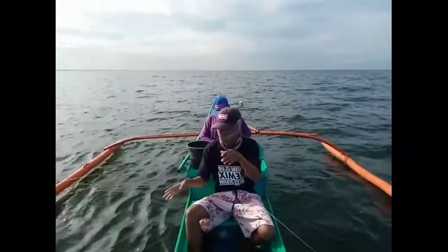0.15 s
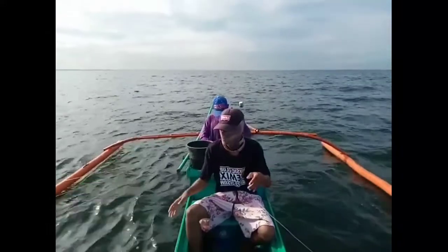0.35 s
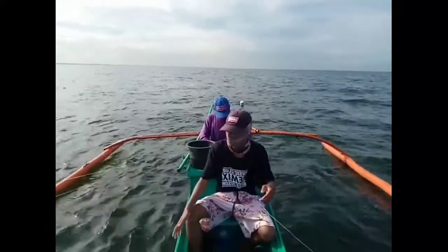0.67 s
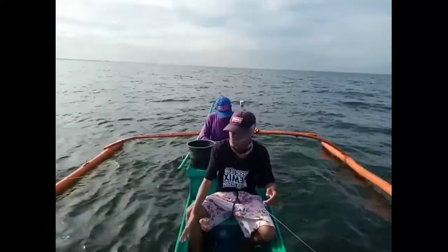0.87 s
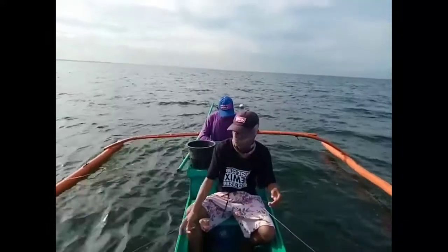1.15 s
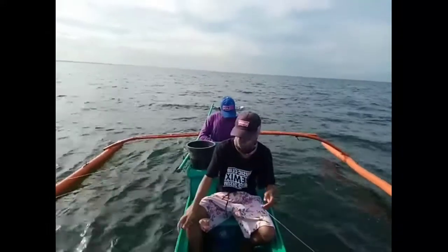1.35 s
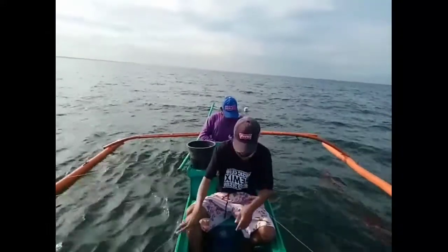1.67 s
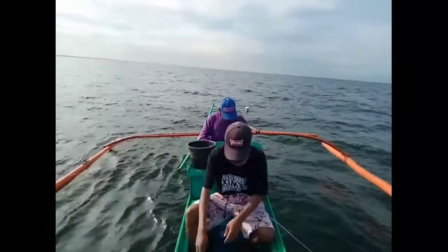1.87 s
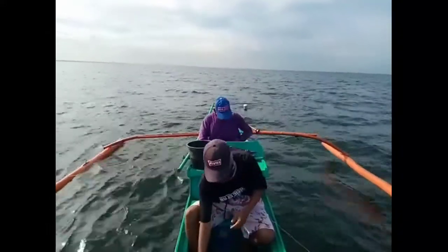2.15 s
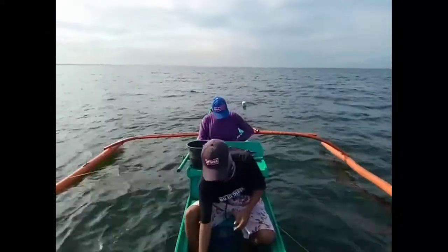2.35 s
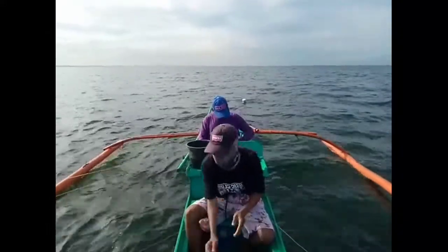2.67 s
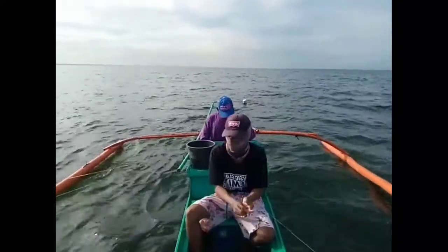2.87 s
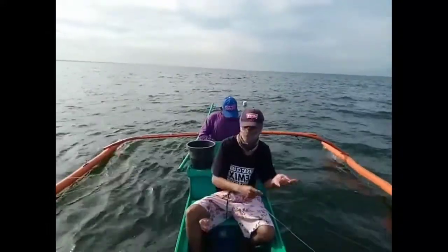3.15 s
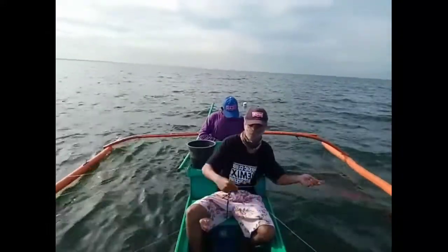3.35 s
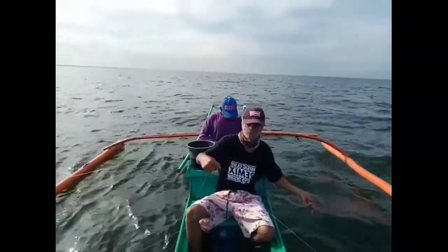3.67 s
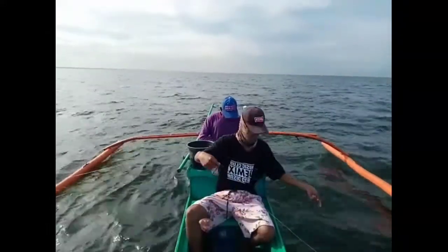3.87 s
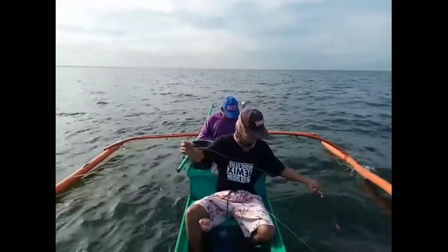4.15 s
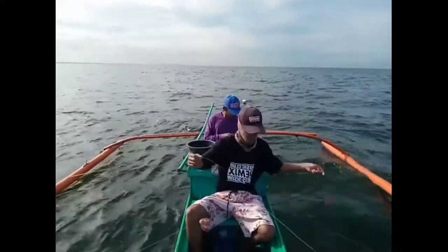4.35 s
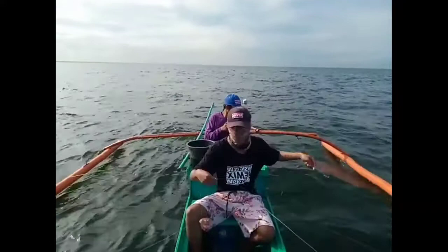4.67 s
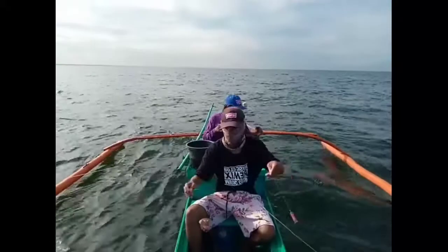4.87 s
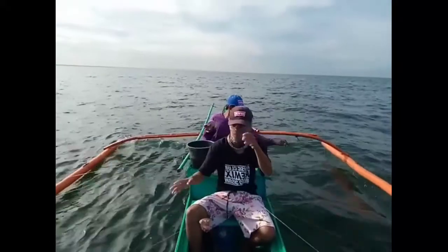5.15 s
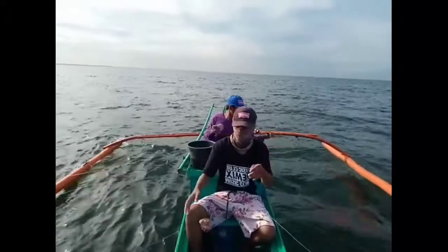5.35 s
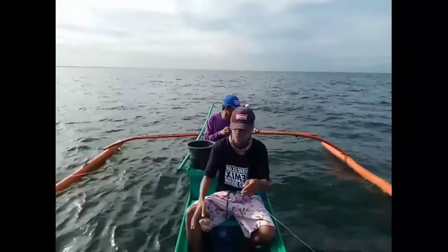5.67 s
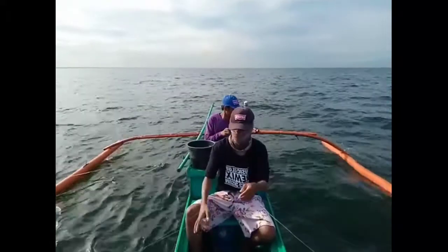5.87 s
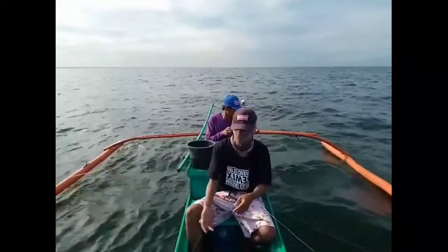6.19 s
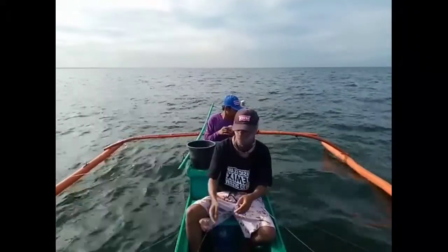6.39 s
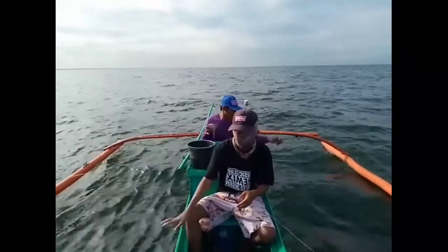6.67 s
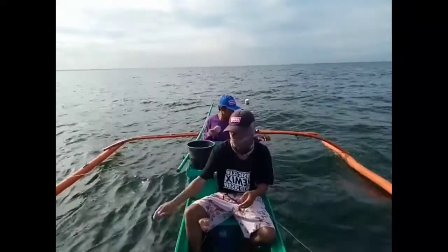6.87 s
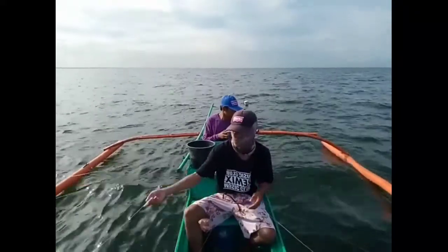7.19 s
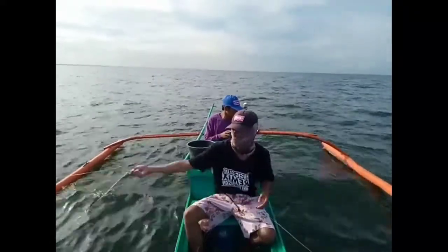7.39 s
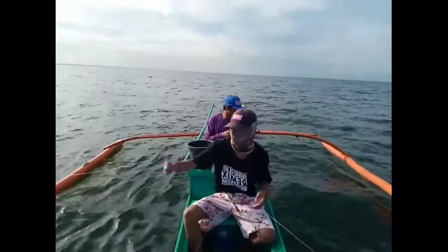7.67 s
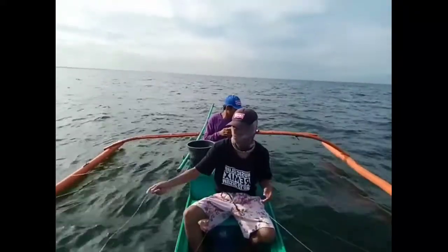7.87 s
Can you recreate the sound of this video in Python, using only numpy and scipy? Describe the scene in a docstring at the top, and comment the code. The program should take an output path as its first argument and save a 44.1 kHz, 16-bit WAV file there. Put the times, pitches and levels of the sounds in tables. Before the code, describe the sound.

Small waves lap and gurgle against a small wooden boat on open sea, with sharp drips, hollow plops, crackling spray and low wind rumble on the microphone.

```python
"""Waves lapping an outrigger boat

Small waves lap at the hull of a boat drifting on open sea, gurgling as swarms of ringing bubbles.
Trapped air pockets plop, hollows glug, and spray crackles and ticks as bursts of tiny rings and noise.
Gusts of wind rumble as shaped noise and bump as brief pitch sweeps on the nearly mono microphone."""
import sys
import numpy as np
from scipy import signal
from scipy.fft import rfft, irfft, next_fast_len
from scipy.io import wavfile
from scipy.ndimage import uniform_filter1d, map_coordinates

SR = 44100
rng = np.random.default_rng(int(sys.argv[2]) if len(sys.argv) > 2 else 0)


def generate_wav(signal):
    """Clip the signal to [-1, 1] and save it as 16-bit WAV at the path in sys.argv[1]."""
    frames = np.transpose(np.atleast_2d(signal))
    scaled = np.clip(frames, -1, 1) * 32767
    pcm = np.round(scaled).astype(np.int16)
    wavfile.write(sys.argv[1], SR, pcm)


N = 354123
TOP_HZ = 15700  # band limit, also the cap on bubble pitch
STEP = 32  # samples between points of an envelope


def amp(db):
    """Decibels to gain."""
    return 10 ** (np.asarray(db) / 20)


def unit(x):
    """Scale to rms 1."""
    return x / np.sqrt(np.mean(x ** 2) + 1e-20)


def along(points, hz):
    """(Hz, value) points read on a log frequency axis."""
    f, v = np.transpose(points)
    return np.interp(np.log(hz + 1), np.log(f + 1), v)


def filtered(x, response):
    """x times a response of frequency."""
    size = next_fast_len(N + SR // 2)
    gain = response(np.fft.rfftfreq(size, 1 / SR))
    return irfft(rfft(x, size) * gain, size)[..., :N]


def coloured(x, spectrum):
    """x filtered by (Hz, dB) points, at rms 1."""
    return unit(filtered(x, lambda hz: amp(along(spectrum, hz))))


def noise(spectrum):
    """Fresh noise of rms 1 with this spectrum."""
    return coloured(rng.standard_normal(N), spectrum)


def band_noise(centres_hz, size, low, high):
    """One row of noise of rms 1 per centre, between low and high times its pitch."""
    rows = []
    for band in np.minimum(centres_hz * [low, high], TOP_HZ):
        b, a = signal.butter(2, band, "band", fs=SR)
        rows.append(unit(signal.lfilter(b, a, rng.standard_normal(size))))
    return np.array(rows)


def even(x, seconds):
    """x with its slow swells levelled out."""
    width = int(seconds * SR)
    power = uniform_filter1d(uniform_filter1d(x ** 2, width), width)
    return x / np.sqrt(np.abs(power) + 1e-9)


def flutter(rate):
    """A smooth random curve, rate knots a second."""
    knots = rng.standard_normal(int(N * rate / SR) + 4)
    return map_coordinates(knots, [np.arange(N) * rate / SR])


def patchy(x, depth_db, size):
    """Random gain in patches of frequency and time, size frames long."""
    z = signal.stft(x, nperseg=512)[2]
    field = rng.standard_normal(z.shape)
    for _ in range(2):
        field = uniform_filter1d(field, size=4, axis=0)
        field = uniform_filter1d(field, size=size, axis=1)
    return unit(signal.istft(z * amp(depth_db * unit(field)), nperseg=512)[1][:N])


def swell(start, hold, rise, fall):
    """Envelope in dB: attack, hold and release, the slopes given as seconds per 20 dB."""
    t = np.arange(0, N, STEP) / SR - start
    attack = np.minimum(t / rise, 0)
    release = np.maximum(t - hold, 0) / fall
    return 20 * np.maximum(attack - release, -10)


def per_sample(envelope):
    """An envelope with one value for every sample."""
    return np.interp(np.arange(N), np.arange(0, N, STEP), envelope)


def together(levels_db):
    """The level of several envelopes at once: their powers add."""
    power = sum(amp(db) ** 2 for db in levels_db)
    return per_sample(10 * np.log10(power))


def placed(starts, sounds):
    """Sum rows of sound at their start times in seconds."""
    first = np.round(np.abs(np.reshape(starts, (-1, 1))) * SR).astype(int)
    index = first + np.arange(sounds.shape[1])
    return np.bincount(index.ravel(), sounds.ravel(), N)[:N]


def bubble(t, hz, t60, rise, onset_cycles):
    """A damped ring whose pitch moves by rise octaves over t60, up as a bubble nears the surface."""
    pitch_hz = hz * 2 ** (rise * np.minimum(t / t60, 1))
    phase = 2 * np.pi * np.cumsum(pitch_hz, axis=-1) / SR
    return np.sin(phase) * amp(-60 * t / t60) * (1 - np.exp(-t * hz / onset_cycles))


def swarm(count, size, centre_hz, octaves, cycles, rise, onset_cycles=0.34):
    """Bubbles at random times, of random pitch, life and strength; centre_hz may be a curve."""
    when, pitch, life, strength, sign = rng.random((count, 5)).T[..., None]
    centre = np.broadcast_to(centre_hz, N)[(when * N).astype(int)]
    hz = np.minimum(centre * 2 ** (octaves * (2 * pitch - 1)), TOP_HZ)
    t60 = cycles * 2 ** (2 * life - 1) / hz
    rings = bubble(np.arange(size) / SR, hz, t60, rise, onset_cycles)
    # most are faint, a few strong
    gain = amp(7 * np.minimum(-np.log(1 - strength), 2.8)) * np.sign(sign - .5)
    fade = np.sqrt(np.linspace(1, 0, size))
    return unit(placed(when * N / SR, gain * rings * fade))


def wind():
    """Eddies rumble on the microphone in uneven lumps, deeper as the wind grows."""
    # Each row: start in seconds, time at full level in seconds, relative level in dB.
    gusts = [(0.0, 0.33, -37.5), (0.6, 0.19, -36.5), (0.86, 0.37, -41.0), (1.32, 0.15, -37.0),
             (1.6, 0.61, -44.0), (2.36, 0.12, -42.0), (2.56, 0.25, -47.5), (2.91, 0.33, -42.5),
             (3.35, 0.07, -34.0), (3.46, 0.46, -45.0), (3.98, 0.26, -40.0), (4.35, 0.09, -33.5),
             (4.85, 0.1, -45.0), (5.09, 0.23, -45.5), (5.47, 0.26, -43.5), (5.92, 0.5, -49.0),
             (6.51, 0.32, -35.0), (6.92, 0.25, -38.0), (7.21, 0.27, -43.0), (7.55, 0.36, -47.0)]
    # Spectra of weak and strong wind. Each row: frequency in Hz, relative level in dB.
    breeze_spectrum = [(25, -55), (48, -36), (90, -7), (130, 0), (170, -7), (260, -23.5), (380, -33),
                       (1300, -64)]
    gust_spectrum = [(25, -38.5), (60, -1.5), (96, 0), (141, -2.5), (270, -34), (490, -44.5), (1300, -70.5)]
    calm_db = -57  # relative, between gusts
    rise_s, fall_s = .033, .074  # per 20 dB
    levels_db = [calm_db] + [db + swell(s, hold, rise_s, fall_s) for s, hold, db in gusts]
    level_db = together(levels_db)
    strong = np.clip((level_db + 49) / 10, 0, 1)
    rumble = np.sqrt(1 - strong) * noise(breeze_spectrum) + np.sqrt(strong) * noise(gust_spectrum)
    lumps_db = 3 * flutter(24)
    return amp(level_db + .3) * even(amp(lumps_db) * rumble, seconds=0.24)


def lapping():
    """Each wave swells and drains, driving gurgle and spray; stronger waves weigh more in bubble pitch."""
    # Waves folding over along the hull. Each row: crest in seconds, relative gurgle level in dB,
    # relative spray level in dB, swell in seconds per 20 dB, drain in seconds per 20 dB,
    # bubble pitch in Hz.
    waves = [(0.143, -53.5, -57.5, 0.17, 0.76, 1570.0), (0.52, -46.0, -46.0, 0.025, 0.16, 2200.0),
             (1.017, -48.5, -61.5, 0.17, 0.16, 1780.0), (1.356, -51.0, -60.5, 0.05, 0.23, 1150.0),
             (1.576, -56.5, -55.5, 0.39, 0.46, 1780.0), (1.905, -52.0, -69.5, 0.06, 0.12, 1700.0),
             (2.355, -41.5, -66, .035, .08, 2000), (2.428, -37, -44.0, 0.09, 0.06, 1800.0),
             (2.605, -56.5, -57.5, 0.1, 0.9, 1400.0), (2.927, -53.5, -55.0, 0.1, 0.24, 1710.0),
             (3.26, -54.0, -67.5, 0.03, 0.12, 1130.0), (3.805, -53, -63.0, 0.1, 0.04, 1980.0),
             (4.056, -47, -44.5, 0.14, 0.4, 1900.0), (4.166, -43.0, -42.5, 0.04, 0.11, 1650.0),
             (4.555, -54.5, -58, 0.19, 0.29, 1650.0), (4.843, -64.0, -57.5, 0.05, 0.56, 1630.0),
             (5.185, -47.0, -53.0, 0.02, 0.41, 1110.0), (5.599, -44.5, -42.0, 0.19, 0.26, 1220.0),
             (5.721, -38.5, -39.0, 0.06, 0.18, 1960.0), (5.894, -41.0, -50.0, 0.07, 0.39, 1270.0),
             (6.26, -52, -64, .3, .18, 1900), (6.739, -57.5, -37.5, 0.07, 0.05, 2350.0),
             (6.884, -52.0, -62.0, 0.03, 0.15, 1560.0), (7.11, -43.5, -44.0, 0.02, 0.16, 2890.0),
             (7.183, -44.5, -48.5, 0.07, 0.06, 2310.0), (7.365, -56.0, -39.0, 0.02, 0.07, 2740.0),
             (7.563, -65.5, -48.0, 0.07, 0.15, 2740.0)]
    # Spatters thrown clear of the waves. Each row: time in seconds, relative level in dB.
    spatters = [(0.726, -42.0), (0.803, -44.0), (0.938, -48.0), (1.113, -55.0), (2.511, -41.0),
                (2.78, -48.0), (3.039, -46.0), (3.075, -48.0), (3.409, -48.0), (3.961, -44.0),
                (4.022, -42.0), (4.339, -47.0), (4.982, -53.0), (6.311, -49.0), (6.678, -43.0),
                (6.785, -43.0), (6.938, -50.0), (7.27, -44.0), (7.311, -42.0), (7.418, -40.0),
                (7.814, -54.0)]
    ripple_gurgle_db, ripple_spray_db = -80, -73.5  # relative, between the waves
    crest_hold_s = .01
    spatter_rise_s, spatter_fall_s = .014, .049  # per 20 dB
    spatter_gurgle_db = -12  # against the spatter's spray
    gurgles, sprays, weight, pitch = [ripple_gurgle_db], [ripple_spray_db], 0, 0
    for s, gurgle_db, spray_db, rise, fall, hz in waves:
        shape_db = swell(s, crest_hold_s, rise, fall)
        gurgles.append(gurgle_db + shape_db)
        sprays.append(spray_db + shape_db)
        share = amp(gurgle_db + shape_db)
        weight, pitch = weight + share, pitch + share * hz
    for s, db in spatters:
        spatter_db = db + swell(s, 0, spatter_rise_s, spatter_fall_s)
        gurgles.append(spatter_db + spatter_gurgle_db)
        sprays.append(spatter_db)
    return together(gurgles), together(sprays), per_sample(pitch / weight)


def spray(level_db, churn_db):
    """Thrown water crackles with dense, overlapping droplets; the quiet wash is trickling foam."""
    # Spectra of splash and wash. Each row: frequency in Hz, relative level in dB.
    splash_spectrum = [(1000, -20.5), (2200, -4.5), (3800, -9.5), (5200, 0.5), (7000, 3), (8300, -4.5),
                       (11000, -2), (13000, -10.5), (16000, -2)]
    wash_spectrum = [(1200, -7), (2600, -3), (4400, -7), (5300, 1), (7200, 5.5), (9000, -2), (11000, -5),
                     (13000, -16.5)]
    breaking = np.clip((level_db + 0.13 * (level_db - churn_db) + 56) / 12, 0, 1)
    drops = swarm(count=4500, size=240, centre_hz=6700, octaves=1.55, cycles=21, rise=0, onset_cycles=.6)
    cracks = swarm(count=2200, size=80, centre_hz=7200, octaves=1, cycles=2.8, rise=0)
    foam = swarm(count=2400, size=600, centre_hz=5600, octaves=1.2, cycles=60, rise=0, onset_cycles=3)
    splash = coloured(drops + cracks, splash_spectrum) + .3 * noise(splash_spectrum)
    splash = patchy(splash, depth_db=3, size=2)  # short patches: bursts of drops
    trickle = patchy(noise(wash_spectrum), depth_db=5, size=7)  # long patches: drifting colour
    wash = coloured(foam + .7 * cracks, wash_spectrum) + .85 * trickle
    mix = np.sqrt(breaking) * splash + np.sqrt(1 - breaking) * unit(wash)
    clumps_db = (2.6 + breaking) * flutter(55)
    return amp(level_db + clumps_db + 1) * even(mix, seconds=0.1)


def gurgle(level_db, pitch_hz):
    """A hollow rush along the hull: ripples shed ringing bubbles, strong waves masses of short ones."""
    # Spectrum of the rush. Each row: octaves above the bubble pitch, relative level in dB.
    rush_spectrum = [(-2.2, -30), (-.8, 1), (.1, -1.5), (1.2, -5), (2.4, -28)]
    hz, s, z = signal.stft(rng.standard_normal(N), SR, nperseg=512)
    frame_pitch_hz = np.interp(s * SR, np.arange(N), pitch_hz)
    octaves = np.log2((hz[:, None] + 1) / frame_pitch_hz)
    rush_db = np.interp(octaves, *np.transpose(rush_spectrum))
    rush = signal.istft(z * amp(rush_db), nperseg=512)[1]
    thick = np.clip((level_db + 57) / 16, 0, .85)
    mass = swarm(count=3200, size=900, centre_hz=pitch_hz, octaves=1.2, cycles=22, rise=.2, onset_cycles=2)
    rings = swarm(count=1500, size=1800, centre_hz=pitch_hz, octaves=1.1, cycles=60, rise=.3,
                  onset_cycles=3.5)
    bubbles = np.sqrt(thick) * mass + np.sqrt(1 - thick) * rings
    churn = bubbles + .65 * patchy(rush, depth_db=6, size=6)
    return amp(level_db - 6.3) * even(churn, seconds=0.09)


def boat(x):
    """Short diffuse reflections from inside the boat: convolution with decaying noise."""
    # Each row: frequency in Hz, t60 in seconds.
    decay = [(300, 0.071), (2000, 0.054), (7000, 0.083), (15000, 0.017)]
    hz, t, z = signal.stft(rng.standard_normal(SR // 4), SR, nperseg=256)
    fade_db = -60 * t / along(decay, hz)[:, None]
    tail = signal.istft(z * amp(fade_db), SR, nperseg=256)[1]
    return signal.fftconvolve(x, tail / np.linalg.norm(tail))[:N]


def sea():
    """The faint wash of open water all around: steady shaped noise."""
    return amp(-71) * noise([(300, 12), (1500, -7), (7000, -29)])


def bumps():
    """Big eddies shake the diaphragm, each fastest at its core, with finer turbulence inside."""
    # Each row: centre in seconds, level in dB, top pitch in Hz, half length to 1/e in seconds.
    eddies = [(0.2047, -11, 345, 0.013), (.2087, -13, 99, 0.019), (0.232, -14, 159, 0.0049),
              (0.616, -21, 124, 0.004), (0.779, -24, 109, 0.0074), (4.0, -20, 102, 0.0056),
              (6.514, -26, 150, .008), (7.045, -16, 120, 0.0048), (7.058, -37, 270, .025)]
    t = np.arange(N) / SR
    rim_hz, core_s = 90, .005
    turbulence_spectrum = [(150, -20), (350, 0), (550, -3), (900, -18), (1500, -45), (3000, -90)]
    turbulence = amp(-20.5) * noise(turbulence_spectrum)
    out = np.zeros(N)
    for s, db, hz, half in eddies:
        turns = rim_hz * (t - s) + (hz - rim_hz) * core_s * np.arctan((t - s) / core_s)
        shake = np.cos(2 * np.pi * turns) + turbulence * (hz / 300) ** 2
        out += amp(db) * shake * np.exp(-((t - s) / half) ** 2)
    return out


def drips():
    """Each drop sizzles as it touches, cracks in a few cycles and leaves a short fizz."""
    # Each row: time in seconds, relative level in dB, ring pitch in Hz.
    drops = [(0.5118, -34.5, 7250), (0.5484, -31, 6890), (0.6013, -35, 4620), (0.7605, -33, 7500),
             (0.8011, -29, 4640), (1.0165, -32, 5200), (1.484, -35.5, 5345), (2.389, -37, 3800),
             (2.4316, -32, 6230), (2.5562, -24.5, 4750), (2.779, -40, 6590), (2.9347, -39, 3300),
             (3.261, -43, 4200), (3.403, -36.5, 3180), (3.4126, -38.5, 2940), (3.9235, -32, 2660),
             (3.9596, -32, 7180), (4.0178, -33, 7200), (4.0443, -34, 5440), (4.196, -35, 3800),
             (4.3381, -37.5, 5340), (4.593, -32.5, 2372), (4.952, -35, 5070), (5.2255, -39, 5180),
             (5.6358, -35.5, 6730), (5.7395, -19.5, 5740), (5.7564, -31, 2780), (5.7818, -34, 6770),
             (6.03, -33, 6600), (7.2129, -29, 4105), (7.3104, -34, 6400), (7.3625, -28.5, 6770),
             (7.5983, -35.5, 7710)]
    s, db, hz = np.transpose(drops)[..., None]
    lead_s, contact_s = .003, .001  # sizzle before the tick; tick after the listed time
    t = np.arange(SR // 25) / SR - lead_s
    after = np.maximum(t, 0)
    grit = band_noise(hz, len(t), low=.6, high=1.8)
    crack = grit * amp(-60 * np.abs(t) / .0035)
    tick = bubble(after, hz, t60=.004, rise=-.2, onset_cycles=.4) + .32 * crack
    tick = tick / np.abs(tick).max(axis=1, keepdims=True)
    fizz = grit * amp(-60 * after / .03) * np.minimum(1 + t / lead_s, 1) ** 3
    return placed(s + contact_s - lead_s, amp(db + 8.5) * (tick + amp(-23) * fizz))


def slaps():
    """A flat face of water hits a plank: a sudden, quickly dying burst of noise."""
    # Each row: time in seconds, level in dB, t60 in seconds.
    hits = [(0.6, -38.5, 0.04), (1.0185, -32, 0.037), (5.739, -36, 0.061), (5.893, -41, 0.07)]
    # Each row: frequency in Hz, relative level in dB.
    slap_spectrum = [(700, -40), (2000, 15), (3500, 15.5), (6000, 1), (11000, -5), (16000, -60)]
    s, db, t60 = np.transpose(hits)[..., None]
    t = np.arange(SR // 6) / SR
    bursts = amp(db - 60 * t / t60) * (1 - np.exp(-t / 0.0002))
    return placed(s, bursts) * noise(slap_spectrum)


def plops():
    """Air pockets pinch off with a wet smack and ring; faint ones swell softly, short ones wobble."""
    # Each row: time in seconds, relative level in dB, pitch in Hz, t60 in seconds.
    pockets = [(.704, -39, 3700, .025), (.732, -26, 2000, .0089), (.834, -35, 2320, .022),
               (.846, -36, 760, .074), (1.016, -25.5, 1120, .024), (1.017, -30.5, 1740, .02),
               (1.382, -44, 950, .06), (1.7335, -42, 3000, .03), (1.758, -36.5, 980, .06),
               (1.867, -39.5, 1900, .04), (2.064, -33, 855, .1), (2.197, -39.5, 1560, .055),
               (2.416, -36, 1350, .022), (2.612, -43, 710, .07), (2.6239, -40, 1400, .03),
               (2.832, -36, 1900, .03), (2.912, -39, 2900, .025), (3.012, -43, 1350, .06),
               (3.04, -32, 2090, .022), (3.0504, -33, 2600, .01), (3.301, -43.5, 1020, .06),
               (3.4047, -22.5, 1660, .014), (3.404, -31.5, 1060, .028), (3.4248, -21, 1850, .012),
               (3.787, -40, 2950, .03), (3.972, -37, 2750, .026), (4.067, -33, 2200, .018),
               (4.172, -29.5, 1200, .016), (4.599, -30, 1790, .011), (5.188, -41, 1490, .04),
               (5.245, -45, 790, .11), (5.296, -39, 1700, .03), (5.394, -37, 1010, .055),
               (5.473, -41, 3490, .025), (5.556, -40, 1100, .05), (5.57, -32, 1400, .02),
               (5.745, -22, 1560, .019), (5.747, -29.5, 1020, .024), (5.753, -23, 2860, .012),
               (5.885, -37, 563, .05), (5.894, -31, 1010, .035), (5.934, -28, 690, .022),
               (5.976, -38, 1250, .035), (6.0896, -42, 1930, .025), (6.3244, -41, 2010, .025),
               (6.715, -33, 3100, .012), (6.748, -33, 2850, .015), (6.882, -36, 1016, .035),
               (6.883, -40, 1600, .03), (7.107, -33.5, 2260, .021), (7.129, -28, 2380, .02),
               (7.183, -36, 1650, .03), (7.527, -43, 1960, .03)]
    s, db, hz, t60 = np.transpose(pockets)[..., None]
    t = np.arange(SR // 5) / SR
    waver, shudder = unit(uniform_filter1d(rng.standard_normal((2, len(s), len(t))), size=90))
    wobble = np.minimum(.0013 / t60, .1)
    onset_cycles = np.interp(db, [-43, -32], [3, .5])
    rings = bubble(t, hz * (1 + wobble * waver), t60, 0, onset_cycles)
    rings = rings / np.abs(rings).max(axis=1, keepdims=True) * (1 + .25 * shudder)
    smacks = band_noise(hz, len(t), low=.8, high=1.9) * amp(-60 * t / np.minimum(t60, .05))
    smacks = smacks * (1 - np.exp(-t * hz / onset_cycles))
    return placed(s, amp(db - .3) * rings + amp(db - 14) * smacks)


def glugs():
    """Water fills a hollow against the hull: its ragged ring climbs ever faster as the hollow closes."""
    # Each row: time in seconds, level in dB, start pitch in Hz, pitch after one length in Hz,
    # length in seconds.
    hollows = [(1.84, -45, 1230, 2200, .032), (1.876, -42, 1170, 2900, .042), (2.644, -41, 930, 1200, .024),
               (5.987, -37, 930, 1250, .032)]
    s, db, start_hz, end_hz, length = np.transpose(hollows)[..., None]
    t = np.arange(SR // 10) / SR
    waver = unit(uniform_filter1d(rng.standard_normal((len(s), len(t))), size=60))
    climb = np.minimum(t / length, 1.2) ** 2
    hz = start_hz * (end_hz / start_hz) ** climb * (1 + .06 * waver)
    envelope = (1 - np.exp(-t * start_hz / 3)) * np.exp(-2 * (t / length) ** 2)
    return placed(s, amp(db) * envelope * np.sin(2 * np.pi * np.cumsum(hz, axis=1) / SR))


def scene():
    """Water echoes briefly inside the boat; both channels are alike, but for a trace of width."""
    churn_db, spray_db, pitch_hz = lapping()
    water = spray(spray_db, churn_db) + gurgle(churn_db, pitch_hz)
    water = water + drips() + slaps() + plops() + glugs()
    mid = water + amp(-12.5) * boat(water) + sea() + wind() + bumps()
    side = amp(-25) * boat(water)
    return np.array([mid + side, mid - side])


def record(dry):
    """A very steep low-pass at the band limit."""
    return filtered(dry, lambda hz: 1 / np.sqrt(1 + (hz / TOP_HZ) ** 160))


dry = scene()
out = record(dry)
generate_wav(out)
```